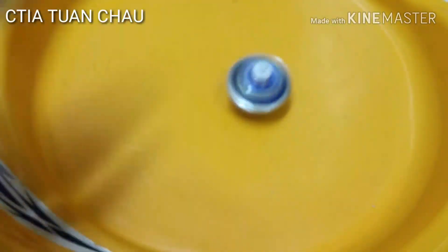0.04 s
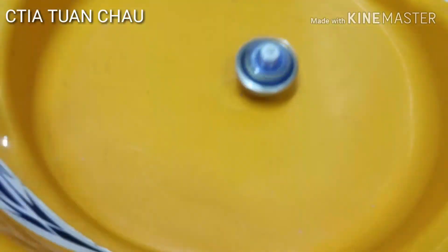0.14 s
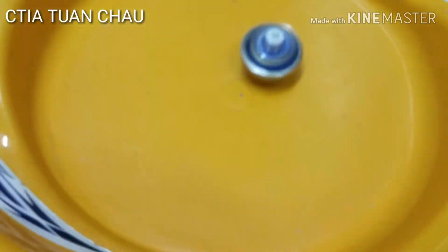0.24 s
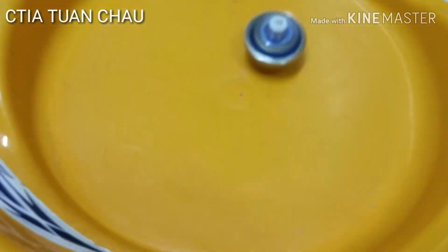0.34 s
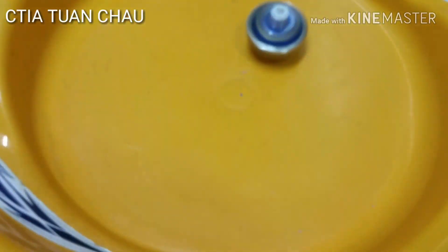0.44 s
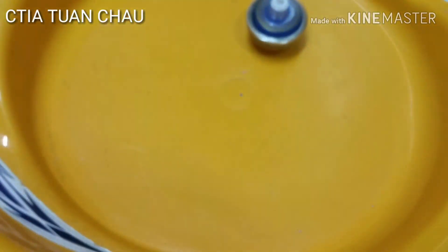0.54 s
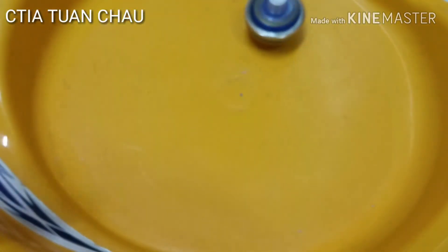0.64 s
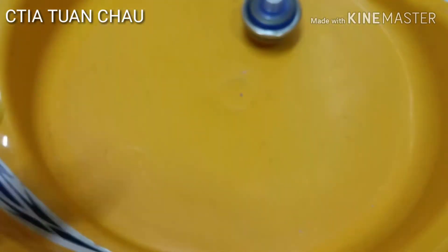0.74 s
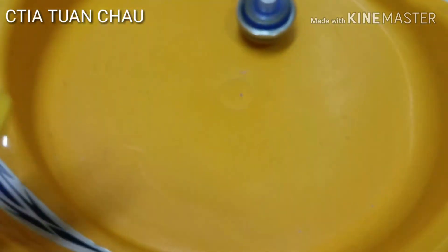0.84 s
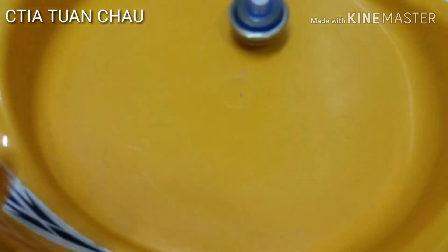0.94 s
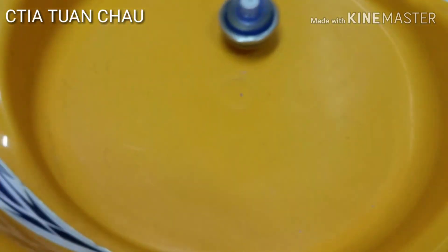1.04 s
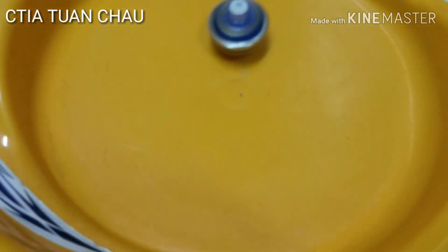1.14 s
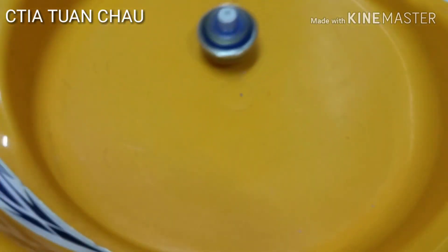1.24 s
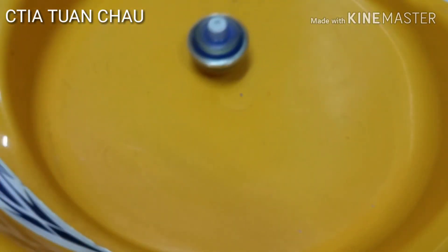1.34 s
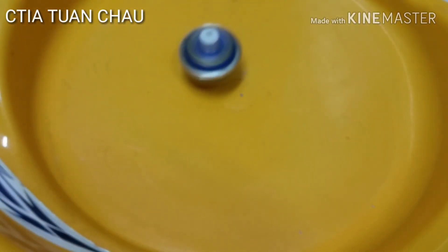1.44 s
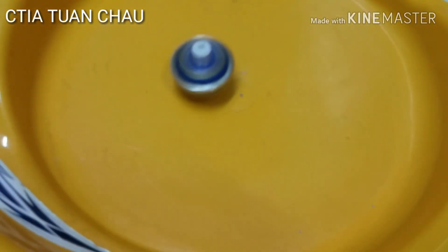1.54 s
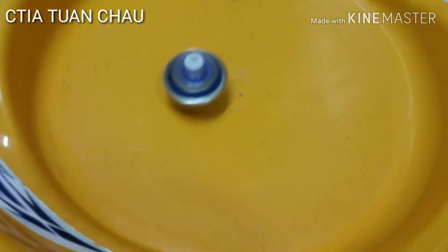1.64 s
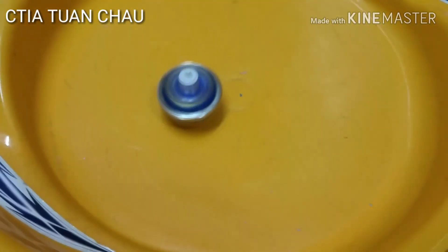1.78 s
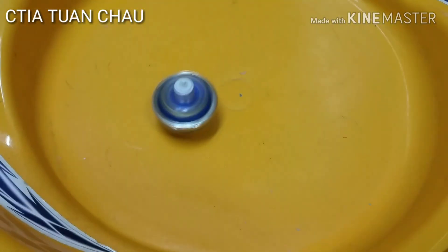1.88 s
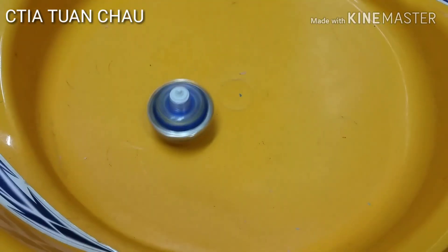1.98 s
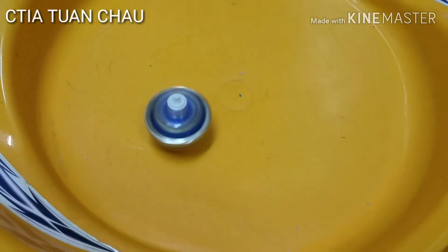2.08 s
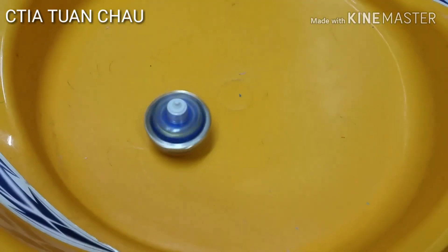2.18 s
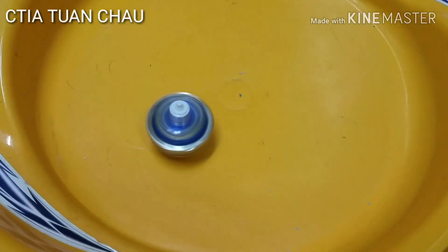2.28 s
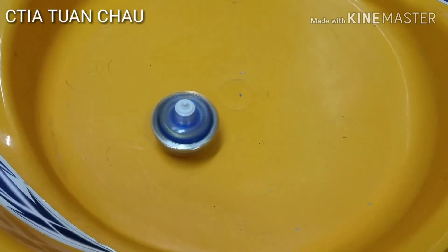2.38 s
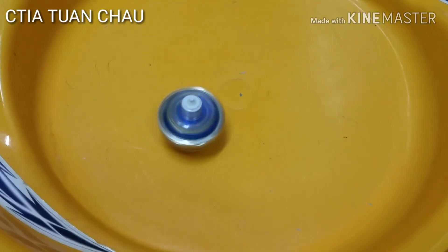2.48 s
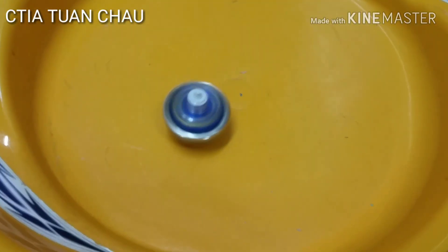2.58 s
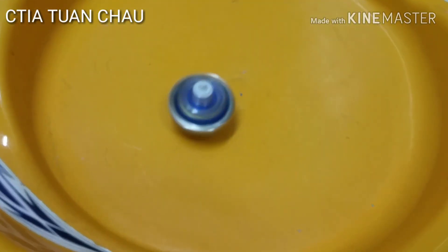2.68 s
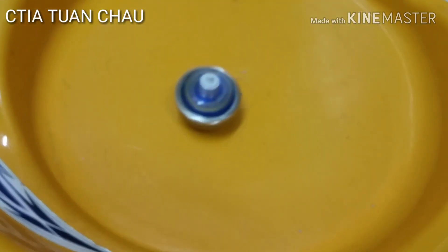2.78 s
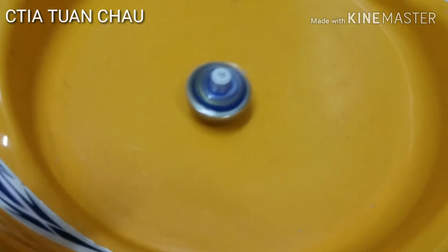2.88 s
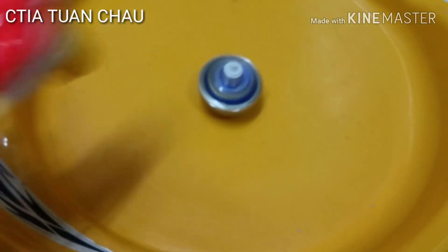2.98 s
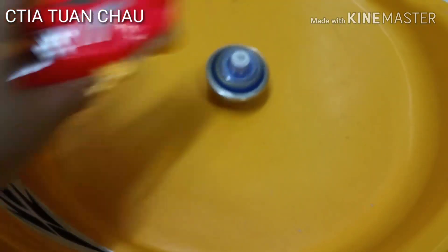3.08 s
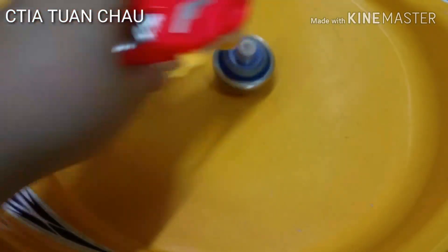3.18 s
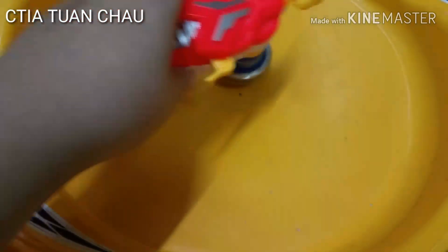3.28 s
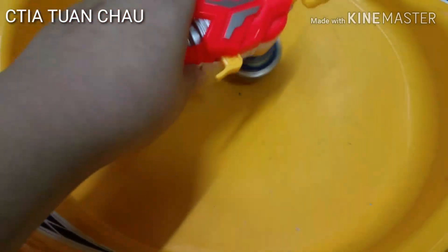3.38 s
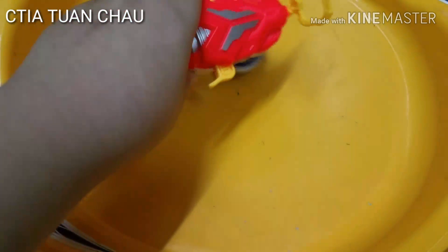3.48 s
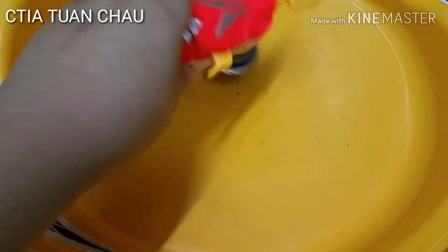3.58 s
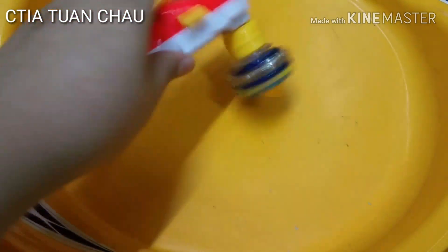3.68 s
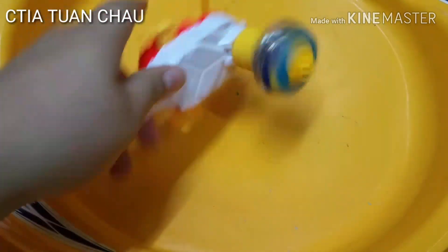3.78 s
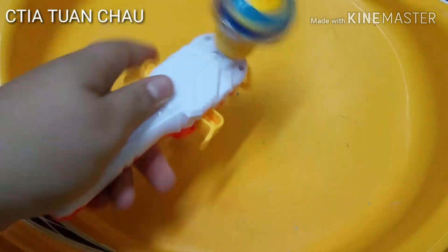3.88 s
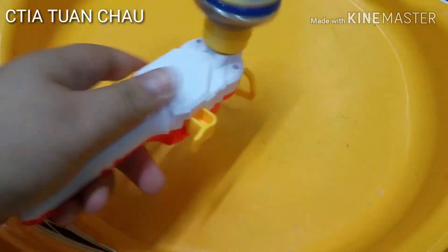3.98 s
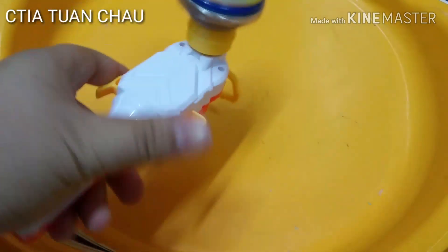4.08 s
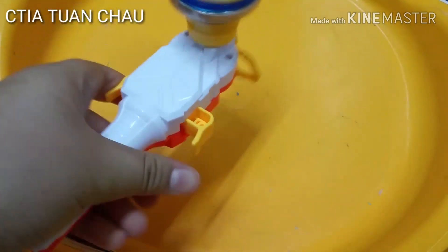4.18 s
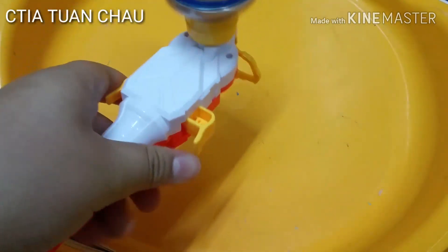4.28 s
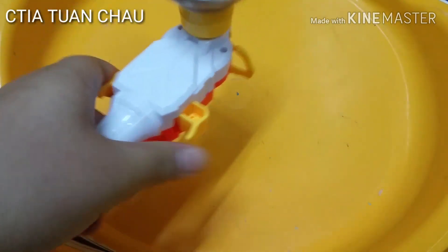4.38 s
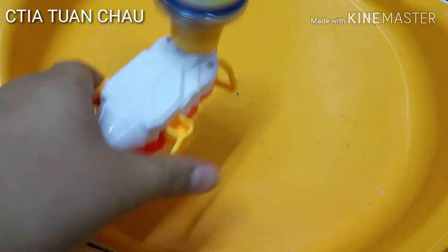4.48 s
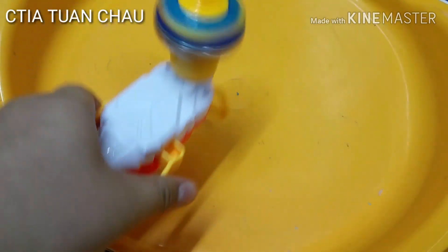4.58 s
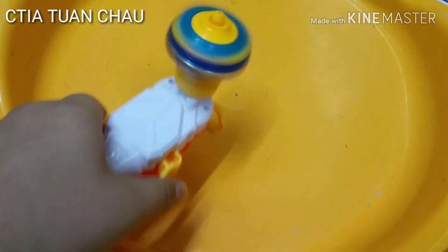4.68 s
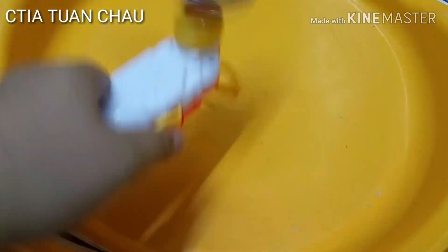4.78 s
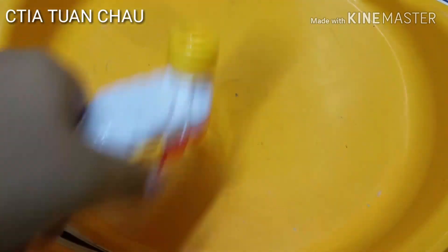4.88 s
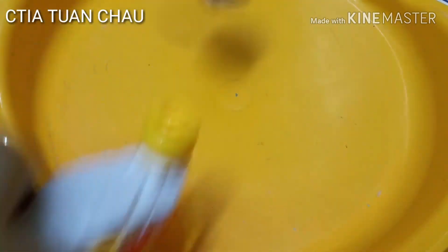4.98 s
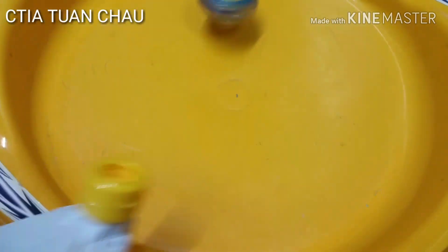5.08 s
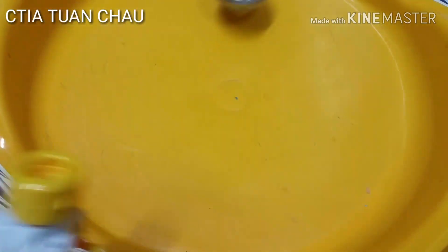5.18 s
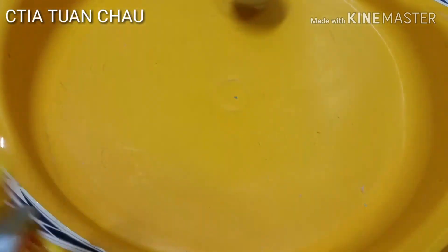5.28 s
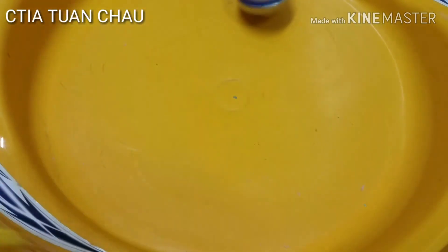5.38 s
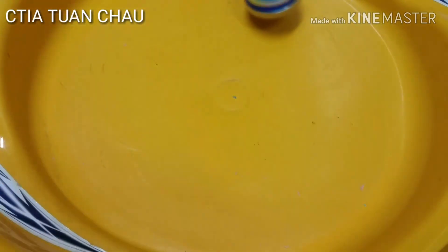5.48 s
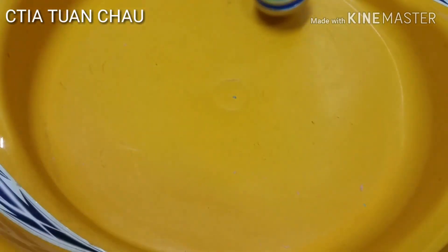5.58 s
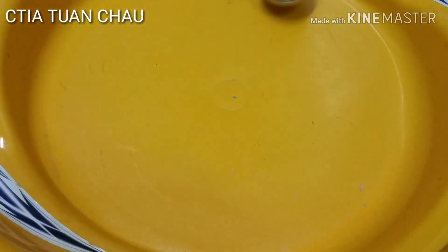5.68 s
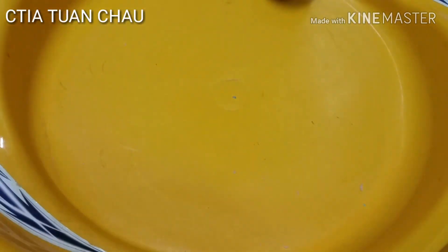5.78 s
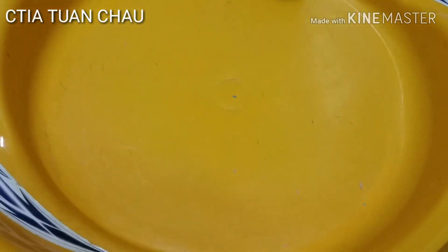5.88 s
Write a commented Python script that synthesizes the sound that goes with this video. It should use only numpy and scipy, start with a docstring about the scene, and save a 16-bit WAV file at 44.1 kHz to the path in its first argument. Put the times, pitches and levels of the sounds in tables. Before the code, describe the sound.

Close stereo microphones in a small, short-echoing room, with low fan hum and a soft rush throughout. From 0 to 3.3 s a metal-rimmed toy top spins on its tip in a plastic basin, quiet and slightly left: a low fluttering drone near 250 Hz, sinking slowly, over rumble that dips around 0.7 s and swells by 1.3 s. Gritty, hissy scrapes rise at 0.2, 0.75-1.3 and 2.7-3 s; faint knocks come at the start and near 3.1 s. At 3.35 s a launcher presses on, suddenly loud: fast toothed grinding and hard plastic clicks until 3.47 s, then knocks to 3.62 s. A bright bearing whirr flutters and weakens until 5 s, with clicks at 3.73, 4.14, 4.2, 4.5, 4.6 and 4.84 s. The top drops: loud hollow booms at 5.11, 5.16 and 5.23 s, weaker ones at 5.33 and 5.43 s, then small taps, ticks and uneven low rumble to 5.9 s.

```python
"""A metal-rimmed toy top spins on its tip in a plastic basin, close to the microphones, in a small room
with a fan: tip noise shakes the basin in time with the turning, over steady hum and a low rush.
A hand-held launcher is pressed onto the top: toothed chatter grinds until the latch catches.
Lifted, the top whirrs in the launcher's bearing, with clicks made of short plastic rings and bright snaps.
Released, it drops into the basin, bounces with hollow knocks of struck modes, and spins on."""
import sys
import numpy as np
from scipy import signal
from scipy.fft import rfft, irfft, next_fast_len
from scipy.io import wavfile
from scipy.ndimage import uniform_filter1d, map_coordinates

SR = 44100
rng = np.random.default_rng(int(sys.argv[2]) if len(sys.argv) > 2 else 0)


def output_pcm(signal):
    """Save a mono or channel-first signal as 16-bit PCM at the path in sys.argv[1].

    Samples are clipped to [-1, 1] before scaling.
    """
    pcm = np.clip(np.atleast_2d(signal).T, -1, 1) * 32767
    wavfile.write(sys.argv[1], SR, np.round(pcm).astype(np.int16))


N = 261954  # length in samples

# the launcher: pressed on, latched, lifted clear of the basin, slipping loose; then the top settles on its tip
PRESS_S, LATCH_S, LIFT_S, RELEASE_S, SETTLE_S = 3.3465, 3.474, 3.61, 4.977, 5.45
REFERENCE_DB = -52  # the rumble level at which friction and lines have their listed levels


def spinning():
    """The top on its tip, a little to the left: that side is louder and hears it first."""
    tip_lead_s = 0.000308
    sides = np.array([[1], [-1]])
    tip = rumbling() + scraping()
    return filtered(tip, lambda hz: np.exp(1j * np.pi * hz * tip_lead_s * sides)) * amp(.8 * sides)


def rumbling():
    """The wandering tip shakes the basin: a broad rumble with lines at multiples of the turning rate."""
    # broad rumble: (frequency [Hz], density [dB per Hz])
    rumble_spectrum = [(60, -14), (120, 9), (270, 5), (400, 5), (540, -0.5), (700, 1), (950, 3.5),
                       (1400, -8), (3000, -17), (8000, -56)]
    # upper lines: (multiple of the turning rate, relative level [dB])
    overtone_lines = [(4, -3), (5, -4), (12, -9), (13, -8), (14, -4), (15, -11), (17, -14)]
    # how far the drone's sixth line stands over its seventh: (time [s], lead [dB])
    drone_lean = [(.1, -14), (.4, 2), (1.3, 10), (1.65, -4.5), (3.0, -5.5)]
    drone_db = -7.5
    drone_grows = .15  # extra dB per dB of rumble: the lines stand out when the basin is shaken hard

    before, after, rumble_db = on_tip()
    angle = 2 * np.pi * turns()

    def line(order):
        return np.sqrt(2) * np.sin(order * angle + 0.3 * wobble(5))

    lean = amp(curves(drone_lean)[0] / 2)
    drone = amp(drone_db) * (lean * line(order=6) + line(order=7) / lean)
    overtones = amp(-9) * sum(amp(db + 1.4 * wobble(3.7)) * line(k) for k, db in overtone_lines)
    lines = amp(drone_grows * (rumble_db - REFERENCE_DB)) * (drone + overtones)
    body = amp(-2.5) * drifting(noise(rumble_spectrum), depth_db=2.0)
    first_spell = before * (lines + body)
    second_spell = amp(-0.5) * after * (overtones + body)  # no drone after the drop
    return amp(rumble_db) * (first_spell + second_spell)


def scraping():
    """The tip rubs the floor: louder as it shakes more, and in swells where it crosses a rough patch."""
    # colours of the three bands: (frequency [Hz], density [dB per Hz])
    scrape_spectrum = [(900, -32), (1800, -17), (2150, 0), (2650, 0), (3200, -11), (6000, -22), (8000, -14),
                       (10000, -30)]
    rasp_spectrum = [(1500, -28), (2700, -4.5), (3200, -4), (3900, 1), (4700, -5), (6500, -27),
                     (12000, -38)]
    hiss_spectrum = [(1000, -2), (2800, -0.5), (5500, -2), (6800, -4.5), (8000, -4.5), (9800, -5),
                     (11700, -13), (14500, -11.5)]
    # rough patches: (time [s], length [s], rasp level [dB], scrape level [dB])
    patches = [(.01, 0.053, -54.5, -72), (0.164, 0.08, -70, -55.5), (0.75, 0.28, -52, -60.5),
               (0.968, 0.19, -52, -50.5), (1.212, 0.064, -69, -50), (2.2, 0.6, -74, -57.5),
               (2.725, .08, -60, -51), (2.958, 0.08, -54, -61)]
    patch_attack_s, patch_t60_s = 0.039, 0.24
    patch_hiss_db = -1.5  # relative to the rasp
    landed_friction_db = -25  # after the drop the tip rubs far less

    before, after, rumble_db = on_tip()
    contact = before + amp(landed_friction_db) * after

    def steady(db, grows):
        """Level at the reference rumble, and dB gained per dB of rumble."""
        return contact * amp(db + grows * (rumble_db - REFERENCE_DB))

    swells = [(held(s, s + length, patch_attack_s, patch_t60_s), rasp_db, scrape_db)
              for s, length, rasp_db, scrape_db in patches]
    rasp = np.max([swell * amp(db) for swell, db, _ in swells], axis=0)
    scrape = np.max([swell * amp(db) for swell, _, db in swells], axis=0)
    bands = [(np.hypot(steady(db=-54.5, grows=0.046), scrape), scrape_spectrum),
             (np.hypot(steady(db=-61.5, grows=1), rasp), rasp_spectrum),
             (np.hypot(steady(db=-52, grows=0.32), amp(patch_hiss_db) * rasp), hiss_spectrum)]
    return sum(level * chatter(colour, rate=500, scatter_db=3.5, t60=0.026, smooth=0.99, swing=0.047,
                               patchy_db=3.5) for level, colour in bands)


def on_tip():
    """Envelopes of the two spells in which the top stands in the basin, and its rumble in dB."""
    # how hard the tip shakes the basin, before the catch: (time [s], rumble level [dB])
    tip_before = [(.15, -53.5), (.3, -61.5), (.68, -66), (1.33, -48.5), (2.0, -51), (2.35, -54),
                  (2.9, -57.5), (3.17, -50.5), (3.3, -55)]
    # and after the drop: (time [s], rumble level [dB])
    tip_after = [(5.5, -44.5), (5.68, -42), (5.79, -49.5), (5.88, -52), (5.935, -40)]
    before = held(0, PRESS_S, attack=0.0033, t60=0.046)
    after = held(SETTLE_S, N / SR, attack=0.13, t60=1)
    return before, after, curves(np.vstack([tip_before, tip_after]))[0]


def turns():
    """How many turns the top has made: it slows steadily."""
    spin_hz, slowing_hz_per_s = 40.1, .62  # turning rate at the start, and its loss each second
    t = np.arange(N) / SR
    return spin_hz * t - slowing_hz_per_s * t ** 2 / 2


def chatter(spectrum, rate, scatter_db, t60, smooth, swing, patchy_db):
    """Tiny contacts (rate per second) of uneven size over smooth rubbing, pressed harder once a turn."""
    hits = (rng.random(N) < rate / SR) * amp(scatter_db * rng.standard_normal(N))
    power = signal.lfilter([1], [1, -amp(-120 / (t60 * SR))], hits ** 2)  # each contact dies away
    once_a_turn = 1 + swing * np.cos(2 * np.pi * turns())
    pressure = np.sqrt(power / power.mean() + abs(smooth)) * once_a_turn
    return drifting(stereo(pressure * rng.standard_normal((2, N)), spectrum), patchy_db)


def drifting(x, depth_db):
    """Narrow resonances that come and go as the top moves against its surroundings."""
    z = signal.stft(x, nperseg=1024)[2]
    across_pitch = uniform_filter1d(rng.standard_normal(z.shape[1:]), size=3, axis=0)
    field = uniform_filter1d(across_pitch, size=16, axis=1)  # smooth in time
    return unit(signal.istft(z * amp(depth_db * unit(field)), nperseg=1024)[1][:, :N])


def rim(x):
    """Colour by the resonances of the top's body."""
    # the top's resonances: (frequency [Hz], width [Hz], gain at the peak [dB])
    resonances = [(1750, 26, 1.5), (2160, 19, 8), (2282, 18, 2.5), (2360, 13, 7.5), (2470, 30, -3.5),
                  (2900, 29, 1.5), (3255, 20, 5), (8130, 41, 7)]

    def response(hz):
        return 1 + sum((amp(db) - 1) * 1j * hz * w / (c * c - hz * hz + 1j * hz * w)
                       for c, w, db in resonances)

    return filtered(x, response)


def launcher():
    """The catch grinds on the top and shakes the basin; then the top runs on in the launcher's bearing."""
    # colours of the grinding teeth and the bearing: (frequency [Hz], density [dB per Hz])
    grinding_spectrum = [(290, -55), (500, -3), (538, -5), (807, -8.5), (1250, -5), (1740, -2.5), (2330, 2),
                         (2810, -4.5), (2980, -16), (3700, -8.5), (5710, -14), (7310, -15), (9920, -13),
                         (15300, -23), (16000, -21)]
    bearing_spectrum = [(240, -12), (400, -8.5), (579, -10), (1130, 0.5), (1230, -1.5), (1420, -1.5),
                        (1600, 0.5), (3070, 1), (4880, -1.5), (5350, -1.5), (6640, -6), (9610, -8.5),
                        (12900, -11), (14600, -14), (16000, -9)]
    # the top running in the launcher: (time [s], whirr level before flutter [dB])
    whirr_level = [(3.55, -32.5), (3.74, -28.5), (3.82, -32.5), (3.89, -30), (4.14, -37.5), (4.23, -33),
                   (4.59, -38.5), (4.68, -34.5), (4.97, -37.5)]
    grind_db, shudder_db, flutter_db = -23.5, -30.5, 0.94

    grind = amp(grind_db) * held(PRESS_S, LATCH_S, attack=0.0032, t60=.12)
    shudder = amp(shudder_db) * held(PRESS_S, LIFT_S, attack=0.0021, t60=0.1205)
    flutter = flutter_db * wobble(35)
    whirr = amp(curves(whirr_level)[0] + flutter) * held(LATCH_S, RELEASE_S, attack=.006, t60=0.52)
    teeth = chatter(grinding_spectrum, rate=220, scatter_db=3, t60=.018, smooth=.15, swing=.15, patchy_db=3)
    bearing = chatter(bearing_spectrum, rate=520, scatter_db=2.5, t60=.018, smooth=1.1, swing=.1,
                      patchy_db=2.5)
    rattle = grind * teeth + whirr * unit(rim(bearing))
    floor = shudder * noise([(35, -37), (75, 7.0), (130, -2.5), (190, 1.5), (260, 0.0), (400, -5),
                             (550, -6.0), (900, -12.5), (3000, -56)])
    return rattle * amp([[-.7], [.7]]) + floor  # the rattle sits a little to the right


def knocks():
    """The top strikes the basin: its floor booms; harder contacts bring more wall clack and tip crack."""
    # blows: (time [s], boom level [dB], hardness = clack and crack over the boom [dB], favoured pitch [Hz])
    blows = [(.0054, -42.5, -3, 105), (0.1043, -53.5, 8, 540), (.129, -50.5, -1, 530),
             (3.033, -47, -4, 400), (3.172, -45, -4, 550), (3.3484, -28, -7, 172), (3.5221, -29.5, 0, 253),
             (3.6009, -24, 5, 433), (3.62, -25, -20, 284), (5.1105, -10, -4.5, 244), (5.161, -17, -13, 297),
             (5.2294, -13, -2.5, 378), (5.3254, -23.5, 0, 256), (5.4259, -24, 2.5, 400),
             (5.472, -38.5, -3, 300), (5.5241, -35, 2, 178), (5.5625, -37, 3, 373),
             (5.619, -39.5, -4.5, 400)]
    # modes of the basin's floor, then its walls: (frequency [Hz], relative level [dB], t60 [s])
    floor_modes = [(80.2, -15, 0.31), (104.3, -3.5, 0.25), (153.8, -8, 0.28), (174, -10, 0.28),
                   (199.8, -12.5, 0.3), (236.3, -7.5, 0.25), (263.8, -3.5, 0.19), (288.2, -4, 0.21),
                   (346.2, -5.5, 0.17), (374.3, -9, 0.22), (432.6, -1, 0.11), (507, -12.5, 0.16),
                   (542.7, -4.5, 0.14), (690, -24, 0.29)]
    wall_modes = [(846, -9.5, 0.06), (923, -5, 0.088), (998, -6, 0.071), (1091, -9, 0.094),
                  (1319, -15, 0.1), (1406, 2.5, 0.04), (1595, -12.5, 0.076), (1670, -18, 0.066)]
    # noise in the boom, the clack and the crack: (frequency [Hz], density [dB per Hz])
    boom_spectrum = [(30, -45), (70, -37), (110, -6), (250, -11), (400, -3), (600, -20), (900, -21),
                     (2000, -32), (4000, -90)]
    clack_spectrum = [(300, -17), (650, 7.5), (950, -5), (1180, -1), (1430, 3.5), (1700, -0.5), (2400, -4),
                      (3500, -7.5), (8000, -35)]
    crack_spectrum = [(1000, -59), (2500, 0), (4000, 8.5), (6500, -1), (11000, -2.5), (16000, -17.5)]
    clack_db, crack_db = 0, -1  # relative to boom plus hardness

    out = np.zeros((2, N))
    t = np.arange(SR // 2) / SR
    for s, db, hardness_db, favoured_hz in blows:
        boom = amp(-1) * ringing(floor_modes, favoured_hz, t)
        boom = boom + amp(-2.5) * burst(boom_spectrum, t60=0.23, attack=0.00057)
        clack = amp(-3.5) * ringing(wall_modes, favoured_hz, t)
        clack = clack + amp(0.0) * burst(clack_spectrum, t60=0.066, attack=0.00033)
        crack = amp(-2) * burst(crack_spectrum, t60=0.019, attack=0.00037)
        crack = crack + amp(-18.0) * burst(crack_spectrum, t60=0.11, attack=0.0013)
        hard = amp(hardness_db) * (amp(clack_db) * clack + amp(crack_db) * crack)
        add(out, s, amp(db) * (boom + hard))
    return out


def ringing(modes, favoured_hz, t):
    """Struck modes; the spot that is hit favours those around one pitch."""
    hz, db, t60 = np.transpose(modes)[:, :, None]
    spot_db = 9 * np.exp(-(np.log(hz / favoured_hz) / 0.076) ** 2) + rng.normal(0, 1, hz.shape)
    phase = rng.uniform(0, 2 * np.pi, hz.shape)
    partials = amp(db + spot_db - 60 * t / t60) * np.sin(2 * np.pi * hz * t + phase)
    return partials.sum(axis=0) * (1 - np.exp(-t / 0.00053))


def burst(spectrum, t60, attack):
    """A dying burst of noise, like many crowded modes struck at once."""
    t = np.arange(SR // 2) / SR
    return noise(spectrum, len(t)) * amp(-60 * t / t60) * (1 - np.exp(-t / attack))


def clicks():
    """Hard plastic and metal clicks: each a short plastic ring with a bright snap on top."""
    # clicks: (time [s], level [dB], snap relative to that level [dB])
    click_rows = [(3.3474, -9.5, -26), (3.353, -9.5, -12), (3.4494, -11, -21), (3.4598, -5.5, -22),
                  (3.469, -7, -3.5), (3.522, -8.5, -7.5), (3.722, -19, -21), (3.728, -5.5, -16),
                  (3.894, -17.5, -10), (4.1408, -19.5, -18), (4.1945, -18, -12), (4.4837, -19.5, -4),
                  (4.6167, -18.5, -11), (4.832, -17.5, -16), (4.837, -8.5, -16.5), (4.897, -29.5, -0.5),
                  (4.973, -33, 5), (5.4347, -31, -3), (5.6413, -40, -27), (5.7335, -38.5, -26),
                  (5.7885, -27, -15), (5.9087, -43, -20)]
    # colours of the ring and the snap: (frequency [Hz], density [dB per Hz])
    ring_spectrum = [(300, -10.5), (1000, -3.5), (2300, 5.5), (3200, -2.5), (5000, -1.5), (7500, -11),
                     (14000, -16.5)]
    snap_spectrum = [(2000, -28), (5500, 5), (7200, 2), (10200, 8), (12500, -4.5), (15500, -7)]
    out = np.zeros((2, N))
    for s, db, snap_db in list(click_rows) + skips():
        ring = amp(-9.5) * burst(ring_spectrum, t60=0.041, attack=0.00019)
        snap = amp(snap_db + 0.5) * burst(snap_spectrum, t60=0.033, attack=0.00089)
        add(out, s, amp(db) * (ring + snap))
    return rim(out) * amp([[-1], [1]])  # a little to the right


def skips():
    """Until the latch holds, the catch skips from tooth to tooth at an uneven pace: rows like the clicks'."""
    skips_per_s = 55  # typical pace
    level_db, scatter_db, snap_db = -12, 1, -15
    chance = rng.standard_normal((32, 2))
    times = PRESS_S + np.cumsum(np.exp(.25 * chance[:, 0])) / skips_per_s
    return [(s, level_db + scatter_db * size, snap_db)
            for s, size in zip(times, chance[:, 1]) if s < LATCH_S]


def room(x):
    """The walls' answer: a noise tail, each frequency dying at its own speed."""
    # reverberation of the small room: (frequency [Hz], t60 [s])
    decay_times = [(100, 0.34), (500, 0.45), (2000, 0.2), (6000, 0.23), (15000, 0.23)]
    hz, t, z = signal.stft(noise([(100, -8), (2000, 4.0), (15000, 7.0)], SR), SR, nperseg=256)
    dying = z * amp(-60 * t / along(decay_times, hz)[:, None])
    tail = signal.istft(dying, SR, nperseg=256)[1]
    delayed = np.pad(x, ((0, 0), (400, 0)))  # 400 samples, about 9 ms, before the first answer
    return signal.fftconvolve(delayed, tail / np.linalg.norm(tail[0]), axes=1)[:, :N]


def background():
    """A hum from the fan and the mains, slightly unsteady in phase, and the low rush of the room."""
    # hum lines of the fan, and of the mains at 100 Hz: (frequency [Hz], level before the overall background
    # level [dB])
    hum_lines = [(47.7, -46.5), (100, -53.5), (143, -58.5), (177, -62)]
    # overall background level: (time [s], gain [dB])
    background_level = [(0, -5.5), (.55, -11.5), (.85, -5.5), (1.15, -4), (1.5, -1), (5.94, -3)]
    # colour of the rush: (frequency [Hz], density [dB per Hz])
    air_spectrum = [(20, -1), (40, -1), (80, 4), (130, -2), (250, -4.5), (500, -15), (1200, -13),
                    (4000, -23), (15000, -48.5)]
    t = np.arange(N) / SR
    hum = sum(np.sqrt(2) * amp(db) * np.sin(2 * np.pi * hz * t + .12 * wobble(2.96))
              for hz, db in hum_lines)
    return amp(curves(background_level)[0]) * (hum + amp(-50.0) * noise(air_spectrum))


def stereo(pair, spectrum):
    """Colour two signals and blend them into left and right, alike or apart by frequency; rms 1."""
    # the likeness of the two channels: (frequency [Hz], correlation [0 to 1])
    likeness = [(60, 0.9), (130, 0.9), (290, 0.97), (640, 0.84), (1400, 0.039), (2400, 0.52), (3800, 0),
                (15000, 0.073)]

    def response(hz):
        turn = np.arccos(np.clip(along(likeness, hz), -1, 1)) / 2
        return amp(along(spectrum, hz)) * [np.cos(turn), np.sin(turn)]

    mid, side = filtered(pair, response)
    return unit(np.array([mid + side, mid - side]))


def noise(spectrum, n=N):
    """Steady stereo noise of one colour, rms 1."""
    return stereo(rng.standard_normal((2, n)), spectrum)


def held(start, end, attack, t60):
    """Envelope: rises at start, holds until end, then dies away (all in seconds)."""
    t = np.arange(N) / SR
    return np.clip((t - start) / attack, 0, 1) * amp(-60 * np.maximum(t - end, 0) / t60)


def wobble(rate):
    """A smooth random curve, rate knots a second."""
    return map_coordinates(rng.standard_normal(int(N * rate / SR) + 4), [np.arange(N) * rate / SR])


def curves(rows):
    """One value per sample for each column after the time."""
    s, *cols = np.transpose(rows)
    return [np.interp(np.arange(N) / SR, s, c) for c in cols]


def along(points, hz):
    """Read (frequency [Hz], value) points on a log frequency axis."""
    f, v = np.transpose(points)
    return np.interp(np.log(hz + 1), np.log(f + 1), v)


def filtered(x, response):
    """x times a response of frequency."""
    n = x.shape[-1]
    m = next_fast_len(n + 8192)
    return irfft(rfft(x, m) * response(np.fft.rfftfreq(m, 1 / SR)), m)[..., :n]


def add(track, s, sound):
    """Mix a sound into the track at s seconds."""
    part = track[:, max(0, round(s * SR)):][:, :sound.shape[-1]]
    part += sound[..., :part.shape[-1]]


def amp(db):
    """Decibels to amplitude."""
    return 10 ** (np.asarray(db) / 20)


def unit(x):
    """Scale to rms 1."""
    return x / np.sqrt(np.mean(x ** 2) + 1e-20)


def scene():
    """The top, launcher and background, and the blows with the room's answer."""
    steady = spinning() + launcher() + background()
    blows = knocks() + clicks()
    return steady + blows + amp(-8.5) * room(blows)


def record(dry):
    """The microphones round off the loudest peaks, drop the deepest bass and keep nothing above a limit."""
    top_hz = 15700
    rounded = dry / (1 + np.abs(dry / .8) ** 6) ** (1 / 6)
    thinned = signal.sosfilt(signal.butter(6, 39, "highpass", fs=SR, output="sos"), rounded)
    return filtered(thinned, lambda hz: hz < top_hz)


dry = scene()
out = record(dry)
output_pcm(out)
```